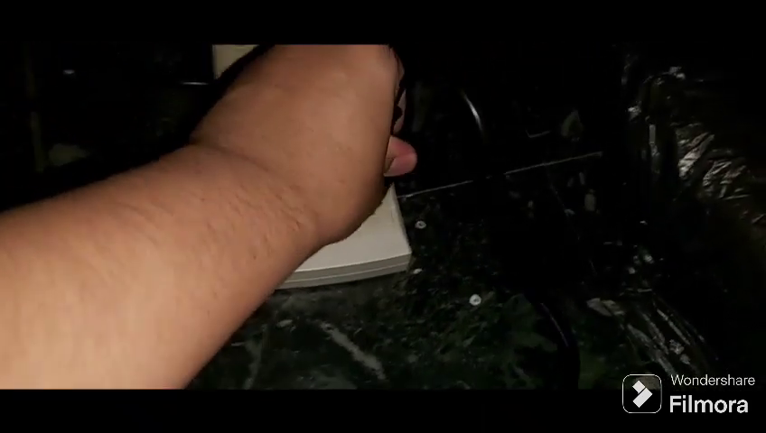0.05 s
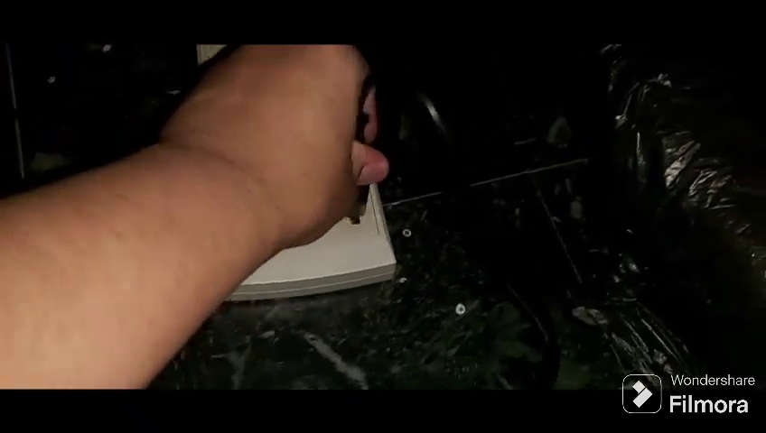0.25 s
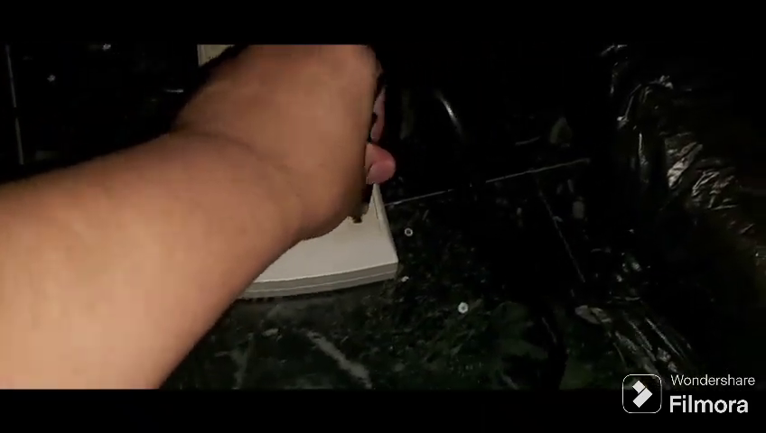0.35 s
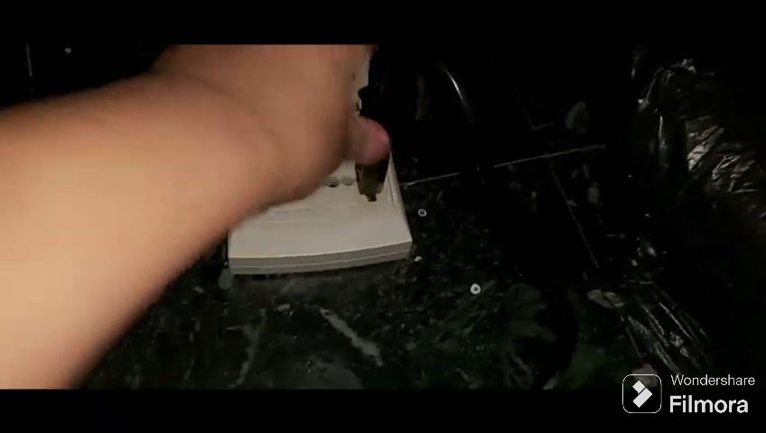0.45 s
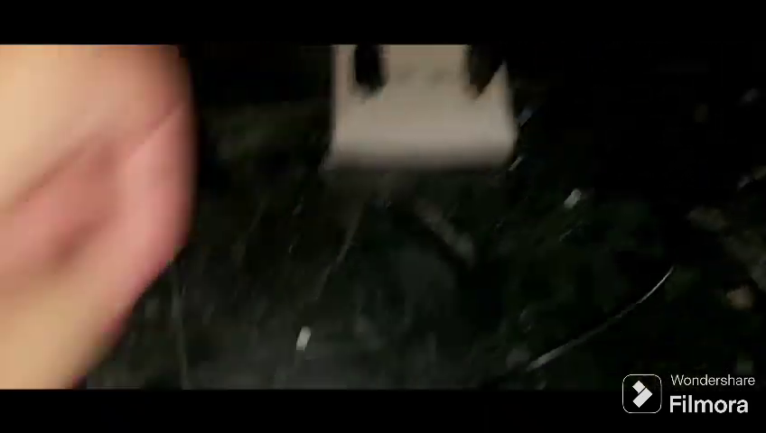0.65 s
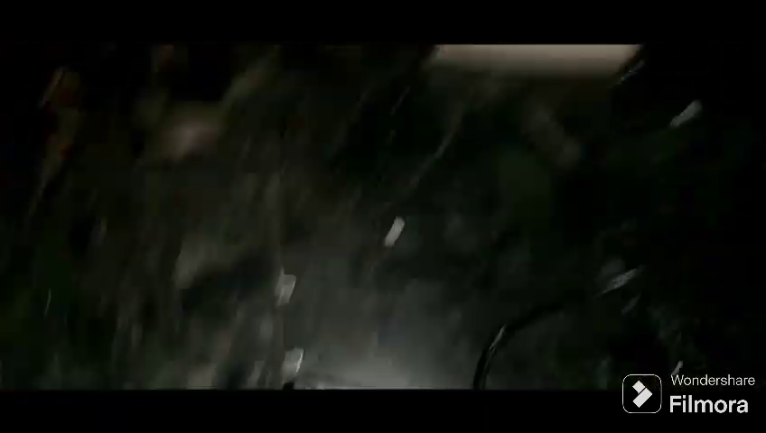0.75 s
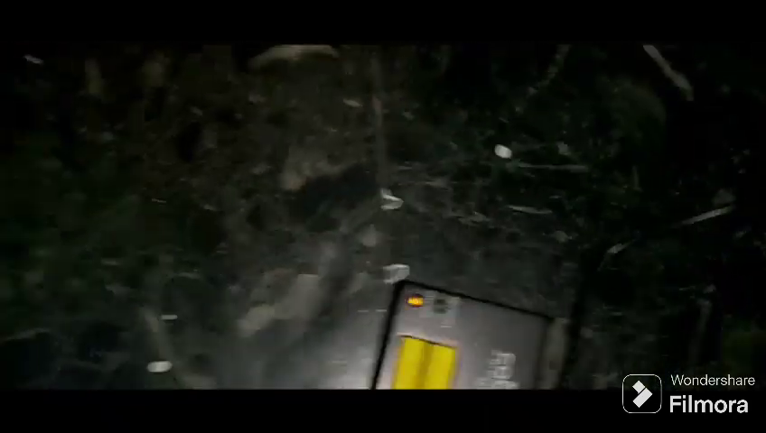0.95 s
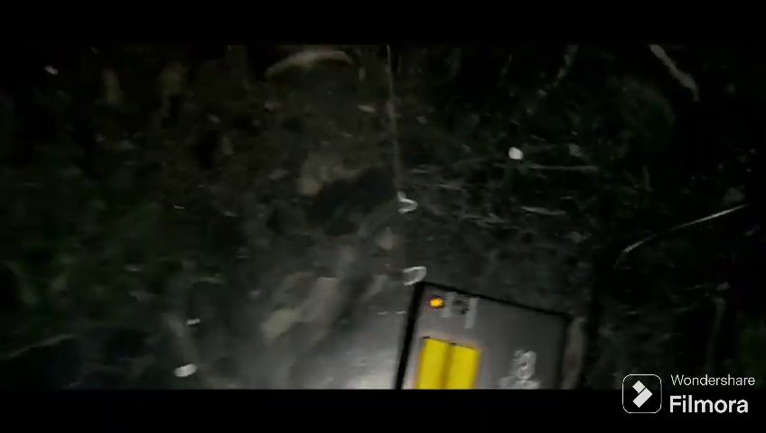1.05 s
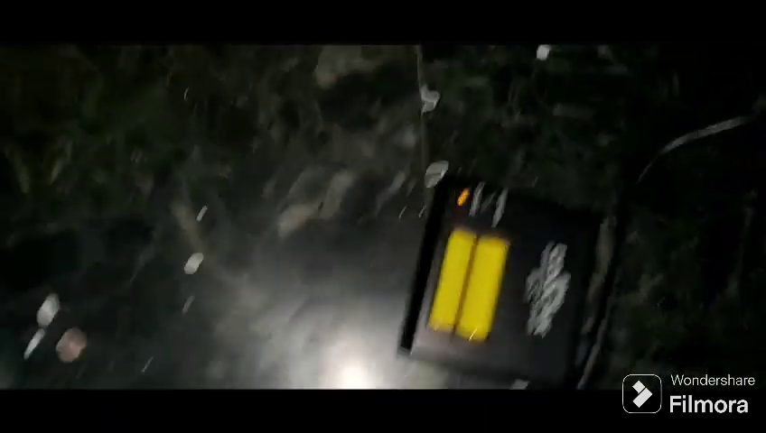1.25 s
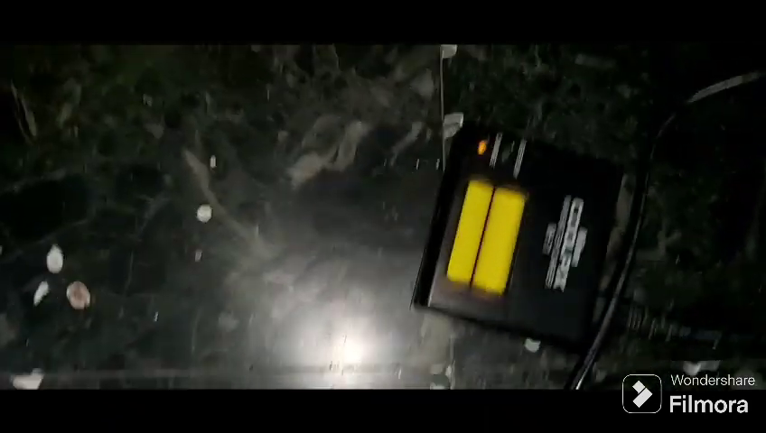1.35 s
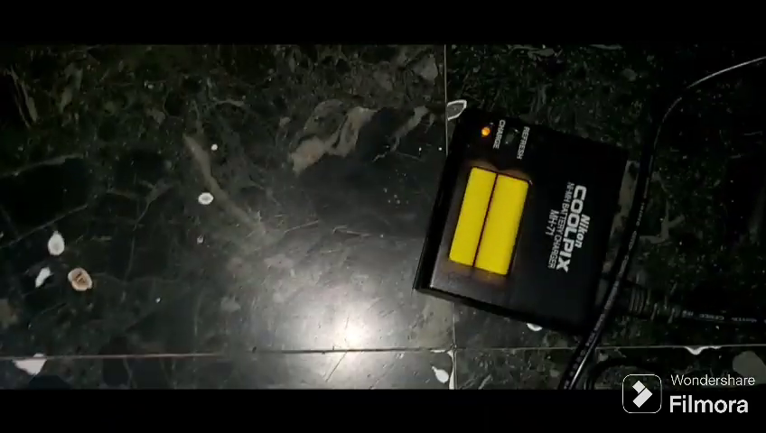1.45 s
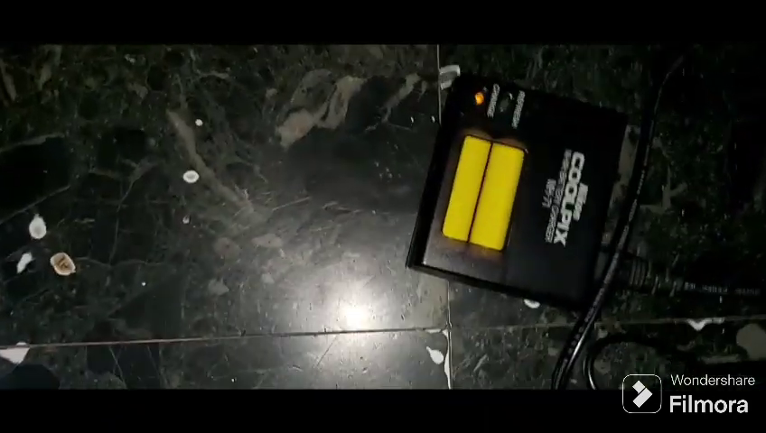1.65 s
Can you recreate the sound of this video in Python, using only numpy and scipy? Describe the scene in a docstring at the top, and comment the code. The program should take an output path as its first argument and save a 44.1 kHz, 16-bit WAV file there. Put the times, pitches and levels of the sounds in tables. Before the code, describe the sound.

Close by in a quiet room, a plug rattles and clicks into a power strip, seating with a hollow knock. After a short pause comes another sharp click, then soft rustling and a little crackle of thin plastic.

```python
"""Scrapes, snaps and a hollow knock: a mains plug is worked into a plastic power strip on a stone floor.
The pins squeak and snap past spring contacts, the plug seats and rings the case, and the hand
nudges it twice on letting go. A sharper plastic click follows, then faint handling noise and a
crinkly rustle. Blows are damped modes plus noise bursts, heard in a small room with a faint hum."""
import sys
import numpy as np
from scipy import signal
from scipy.fft import rfft, irfft
from scipy.io import wavfile

SR = 44100
rng = np.random.default_rng(int(sys.argv[2]) if len(sys.argv) > 2 else 0)


def transcribe(signal):
    """Save signal, clipped to [-1, 1], as a 16-bit WAV file at the path in sys.argv[1]."""
    frames = np.atleast_2d(signal).T
    limited = np.clip(frames, -1, 1)
    pcm = np.round(limited * 32767).astype(np.int16)
    wavfile.write(sys.argv[1], SR, pcm)


N = 74970
CASE_PAN_DB = 5.5

# spring contact noise: f/Hz, level/dB
SPRING_SPECTRUM = [(1000, -3), (3000, -33), (4300, -0.5), (5800, -1), (7600, 5.5), (10500, -1),
                   (13500, 1.5), (16000, -6)]


def case_knocks():
    """Blows ring the hollow case, excite its dense modes and rattle the springs; soft ones are duller."""
    # blows: t/s, ring/dB, clatter/dB, pitch ratio, brightness/Hz
    blows = [(0.033, -55, -69, 1.09, 1420), (0.077, -50.5, -51.5, 1.24, 2010),
             (.083, -47.5, -71, 0.99, 1450), (.096, -47, -39.5, .96, 2040),
             (0.1368, -36.5, -35, 1.02, 2320), (.1708, -35, -46, .95, 4004), (.191, -48, -59.5, 0.97, 4000),
             (.211, -47, -55.5, 1.06, 7040), (.219, -44, -56, 1.03, 3987),
             (0.2266, -11.5, -24.5, 1.0, 11000), (.258, -51, -47, 0.74, 4010),
             (.3660, -40, -42.5, 1.07, 1050), (.5405, -51, -49, 1.04, 995), (.564, -59.5, -53, 0.98, 1197)]
    # hollow case: f/Hz, level/dB, t60/s
    modes = [(636.6, -19, .028), (869, 0, 0.027), (1170, -22, .022), (2030, -31.5, 0.051),
             (2750, -28.5, 0.014), (3327, -22.5, 0.011), (3800, -25.5, 0.022)]
    # dense short modes: f/Hz, level/dB
    clatter_spectrum = [(500, -12), (680, 6.5), (1300, -3), (1700, -2.5), (2400, -7.5), (4100, -9.5),
                        (5200, -19), (8000, -24), (16000, -23.5)]
    contact_cycles, right_lag_s = 1.8, 0.00005
    clatter = noise(clatter_spectrum) * pan(db=2)
    springs = from_db(-21.5) * cut(noise(SPRING_SPECTRUM), 8300, "low", order=6)
    out = 0
    for s, ring_db, clatter_db, pitch, bright_hz in blows:
        hollow = np.zeros((2, N))
        for k, mode in enumerate(modes):
            sides = [ring(s + lag, [mode], pitch, rise_s=0.00058, hold_s=0.00376)
                     for lag in (0, right_lag_s)]
            hollow += (-1) ** k * np.array(sides)  # neighbouring modes in antiphase
        shake = from_db(clatter_db) * decay(s, t60_s=0.059, rise_s=contact_cycles / bright_hz)
        body = from_db(ring_db) * hollow * pan(CASE_PAN_DB) + shake * clatter
        out += cut(body, bright_hz, "low", order=2) + shake * springs
    return cut(out, 532, "high", order=8)


def contacts():
    """Pins scrape along the springs, which snap with a hard edge and ring briefly."""
    # pins passing the springs: t/s, level/dB, pan/dB
    releases = [(.079, -67.5, -9), (0.0965, -31, -3), (.1375, -62.5, -0.5), (0.1717, -43.5, -3.5),
                (0.188, -57.5, 0), (0.2272, -36.5, -2.5)]
    # springs: f/Hz, level/dB, t60/s
    modes = [(7530, -10, .055), (7705, -16.5, 0.045), (8685, -18, .03)]
    # pins sliding: t/s, level/dB
    slide_curve = [(-.05, -50), (.06, -70.5), (.1, -57.5), (.15, -59), (.22, -50.5), (.27, -59),
                   (.36, -93.5)]
    # sliding friction: f/Hz, level/dB
    scrape_spectrum = [(300, -14.5), (900, 8), (1500, -2), (3000, -13.5), (7500, -11.5), (16000, -27.5)]
    crack = noise(SPRING_SPECTRUM)
    snaps = sum(from_db(db) * pan(pan_db) * (crack * snap(s, t60_s=0.039, edge_db=12) + ring(s, modes))
                for s, db, pan_db in releases)
    scrape = level(slide_curve) * noise(scrape_spectrum) * grain(rate_hz=300, depth_db=1.5)
    return snaps + scrape


def squeaks():
    """Pins stick and slip in the socket: short tones of unsteady level."""
    # stick-slip tones: t/s, length/s, f/Hz, level/dB
    slips = [(0.105, 0.051, 717.3, -53), (0.28, 0.031, 966, -55.5)]
    t60_s = 0.04
    tones = sum(ring(s, [(hz, db, t60_s)], rise_s=0.0031, hold_s=length_s)
                for s, length_s, hz, db in slips)
    return tones * grain(rate_hz=170, depth_db=-2.5) * pan(CASE_PAN_DB)


def plastic_click():
    """A hard part, slightly left and too small for bass, touches, snaps over, lands and bounces."""
    # impacts: t/s, ring/dB, crack/dB
    hits = [(0.8102, -49, -65), (0.8121, -43.5, -40), (0.8135, -30, -39), (0.8186, -44, -60)]
    # plastic part: f/Hz, level/dB, t60/s
    modes = [(305, -11, 0.027), (954, -17.5, 0.041), (1630, -15.5, 0.057), (2095, 1, 0.019),
             (2370, -30, 0.012), (2742, -4.5, 0.026), (4700, -12, .01)]
    # impact noise: f/Hz, level/dB
    crack_spectrum = [(350, -3), (600, -12.5), (1300, -12), (2300, 1.5), (3800, -9), (5000, -11),
                      (9000, -18), (16000, -21)]
    right_lag_s = 0.0001
    crack, out = noise(crack_spectrum), 0
    for s, ring_db, crack_db in hits:
        out += from_db(crack_db) * crack * snap(s, t60_s=0.024, edge_db=4)
        out += from_db(ring_db) * np.array([ring(s + lag, modes) for lag in (0, right_lag_s)])
    return pan(db=0.5) * cut(out, 230, "high", order=2)


def ticks():
    """Cable and crinkling plastic tick: tiny cracks, each with a short ring; lower ones are duller."""
    # ticks: t/s, level/dB, pan/dB, ring f/Hz
    events = [(.0475, -61, -1, 5640), (0.7523, -52.5, 3, 4360), (1.194, -56, -5, 1718),
              (1.197, -58, 4, 3250), (1.268, -63, -3, 7400), (1.323, -60.5, -5, 8200),
              (1.636, -35, -6, 5300), (1.641, -36.5, 12.5, 3770), (1.6612, -35.5, 4, 3500),
              (1.676, -38, -9, 2630)]
    # tick noise: f/Hz, level/dB
    crack_spectrum = [(300, -4), (1500, -13), (4200, -3.5), (8000, 1), (16000, -8)]
    ring_db, t60_s = -6, 0.015
    crack, out = noise(crack_spectrum), 0
    for s, db, pan_db, hz in events:
        burst = cut(crack * decay(s, t60_s), 2 * hz, "low", order=2)
        out += from_db(db) * pan(pan_db) * (burst + ring(s, [(hz, ring_db, t60_s)]))
    return out


def rustles():
    """A sleeve swishes, cloth scuffs around the click, thin plastic crinkles."""
    # envelopes: t/s, level/dB
    swish_curve = [(.66, -111), (.79, -78), (1.0, -69.5), (1.08, -81), (1.19, -74.5), (1.3, -89),
                   (1.34, -74), (1.375, -59.5), (1.4, -59.5), (1.45, -80), (1.52, -87), (1.62, -62.5)]
    scuff_curve = [(.68, -82.5), (.8, -64.5), (.825, -57), (.85, -60.5), (.92, -72), (1.0, -78)]
    crinkle_curve = [(1.55, -81), (1.612, -75), (1.637, -45.5), (1.68, -47.5), (1.7, -48)]
    # spectra: f/Hz, level/dB
    swish_spectrum = [(500, 6.5), (1500, -1), (3000, -10), (5000, 5), (9000, 8.5), (16000, 0.5)]
    scuff_spectrum = [(700, 0.5), (1500, -1), (2500, -1), (4600, -3), (6000, -10), (16000, -11)]
    crinkle_spectrum = [(250, -10.5), (650, -29), (1200, -2.5), (2000, -5.5), (2650, 1), (3100, -4),
                        (3800, -1), (4600, -3.5), (5500, -5.5), (7000, -7), (16000, -17)]
    swish = level(swish_curve) * noise(swish_spectrum) * grain(rate_hz=640, depth_db=1.5)
    scuff = level(scuff_curve) * noise(scuff_spectrum) * grain(rate_hz=130, depth_db=2)
    crinkle = level(crinkle_curve) * noise(crinkle_spectrum) * grain(rate_hz=810, depth_db=-1)
    return swish * pan(db=-4) + scuff + crinkle * pan(db=3)


def handling():
    """Moving hands make soft bumps, dull cable taps and a low rumble."""
    # events and rumble envelope: t/s, level/dB
    hand_bumps = [(.097, -54), (0.133, -60), (0.231, -54), (0.539, -61.5), (0.657, -66.5), (0.694, -66.5)]
    cable_taps = [(0.9424, -49), (1.061, -60), (1.108, -57)]
    rumble_curve = [(-.05, -74), (.09, -63), (.14, -58.5), (.26, -55), (.33, -69), (.5, -72.5), (.68, -67),
                    (.85, -60), (1.05, -67.5), (1.55, -70.5), (1.68, -64)]
    # spectra: f/Hz, level/dB
    bump_spectrum = [(40, -5), (90, 0.5), (180, -7), (400, 0.5), (800, -25), (2000, -29), (8000, -46)]
    tap_spectrum = [(170, 14), (400, -16), (700, -7), (1500, -7), (2000, -9.5), (2700, -34), (8000, -14.5),
                    (16000, -47)]
    rumble_spectrum = [(28, -23.5), (45, -5.5), (75, 4.5), (110, 1), (160, -6), (320, -8.5), (550, -20),
                       (3000, -72.5)]
    # tap resonances: f/Hz, level/dB, t60/s
    tap_modes = [(230, -2, 0.033), (398, -7.5, 0.053)]
    bump_envelope = sum(from_db(db) * decay(s, t60_s=0.17, rise_s=0.00035) for s, db in hand_bumps)
    bumps = noise(bump_spectrum) * bump_envelope
    puff = noise(tap_spectrum)
    taps = sum(from_db(db) * (puff * decay(s, t60_s=0.028) + ring(s, tap_modes)) for s, db in cable_taps)
    rumble = level(rumble_curve) * noise(rumble_spectrum)
    return (bumps + taps + rumble) * pan(db=-3)


def background():
    """Room air; a faint steady hum and an uneven whirr fade in together."""
    # spectra: f/Hz, level/dB
    whirr_spectrum = [(400, -15), (570, 4.5), (1800, -42)]
    air_spectrum = [(30, -15.5), (70, 0.5), (130, -0.5), (280, -12.5), (500, -8), (900, -13), (2000, -20.5),
                    (4000, -28.5), (7500, -26), (10000, -30.5), (16000, -25)]
    hum_hz, start_s, fade_s = 533, 0.783, 0.044
    hum = from_db(-78) * np.sin(2 * np.pi * hum_hz * since(0))
    whirr = from_db(-78.5) * noise(whirr_spectrum) * grain(rate_hz=25, depth_db=4)
    air = from_db(-74) * noise(air_spectrum)
    return air + (hum + whirr) * np.tanh(since(start_s) / fade_s)


def room(x, wet_db):
    """Diffuse reflections of a small room; the treble arrives first."""
    # reflections: f/Hz, level/dB
    spectrum = [(100, 1.5), (500, -6), (900, -6), (1500, -3), (2600, -3.5), (9000, -3), (16000, 1.5)]
    t60_s, build_s = 0.17, 0.016
    wash = noise(spectrum)
    low = cut(wash, 4000, "low", order=1)
    tail = low * decay(0.0038, t60_s, build_s) + (wash - low) * decay(0.00097, t60_s, build_s)
    return from_db(wet_db) * signal.fftconvolve(x, rms_one(tail) / np.sqrt(N), axes=1)[:, :N]


def noise(spectrum):
    """Coloured stereo noise, rms 1; coherent in the bass, diffuse in the treble."""
    # left-right coherence: f/Hz, correlation
    coherence = [(60, 0.98), (300, 0.9), (800, 0.019), (1500, -0.043), (14000, -0.079)]
    hz = np.maximum(np.arange(N // 2 + 1) * SR / N, 1)
    alike = np.clip(at_hz(coherence, hz), -0.98, 0.98)
    mid, side = rfft(rng.standard_normal((2, N)))
    stereo = np.sqrt(1 + alike) * mid + np.sqrt(1 - alike) * side * [[1], [-1]]
    bass_rolloff = np.minimum(hz / spectrum[0][0], 1) ** 2
    return rms_one(irfft(stereo * bass_rolloff * from_db(at_hz(spectrum, hz)), N))


def ring(s, modes, pitch=1, rise_s=0.0002, hold_s=0):
    """Damped sines struck at s."""
    return sum(from_db(db) * decay(s, t60_s, rise_s, hold_s) * np.sin(2 * np.pi * hz * pitch * since(s))
               for hz, db, t60_s in modes)


def decay(s, t60_s, rise_s=0.00036, hold_s=0):
    """Envelope of a blow at s: rise, hold, exponential fall."""
    return (1 - np.exp(-since(s) / rise_s)) * from_db(-60 * since(s + hold_s) / t60_s)


def snap(s, t60_s, edge_db):
    """Envelope of a hard contact: brief edge on a longer decay."""
    return decay(s, t60_s) + from_db(edge_db) * decay(s, t60_s=0.0029)


def grain(rate_hz, depth_db):
    """Random level flutter, rms 1."""
    flutter = np.interp(since(0) * rate_hz, np.arange(N), rng.standard_normal(N))
    return rms_one(from_db(depth_db * flutter))


def level(curve):
    """Gain along a (t/s, level/dB) curve, zero before it."""
    return from_db(np.interp(since(0), *np.transpose(curve), left=-np.inf))


def at_hz(points, hz):
    """Table lookup on a log-frequency axis."""
    freqs_hz, values = np.transpose(points)
    return np.interp(np.log(hz), np.log(freqs_hz), values)


def cut(x, hz, kind, order):
    """Butterworth low- or high-pass."""
    return signal.sosfilt(signal.butter(order, min(hz, 0.45 * SR), kind, fs=SR, output="sos"), x + 1e-18)


def pan(db):
    """Stereo gains; db is left minus right."""
    return from_db(np.array([[db], [-db]]) / 2)


def since(s):
    """Seconds since s, zero before."""
    return np.maximum(np.arange(N) / SR - s, 0)


def from_db(db):
    """Decibels to gain."""
    return 10 ** (np.asarray(db) / 20)


def rms_one(x):
    """Scale to rms 1."""
    return x / np.sqrt(np.mean(x ** 2) + 1e-20)


def scene():
    """Plug, ticks, rustles and click with reflections; handling and background dry."""
    near = case_knocks() + contacts() + squeaks() + ticks() + rustles()
    click = plastic_click()
    return near + room(near, wet_db=-14) + click + room(click, wet_db=-12) + handling() + background()


def record(dry):
    """Steep elliptic low-pass."""
    cutoff_hz = 16100
    return signal.sosfilt(signal.ellip(10, 0.3, 80, cutoff_hz, fs=SR, output="sos"), dry)


dry = scene()
out = record(dry)
transcribe(out)
```